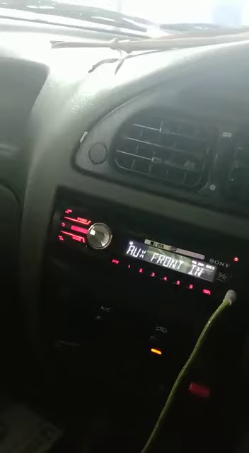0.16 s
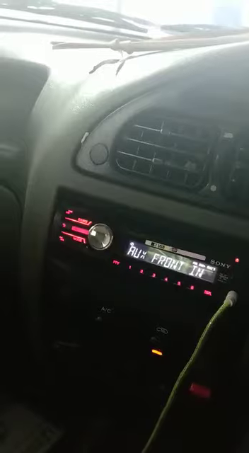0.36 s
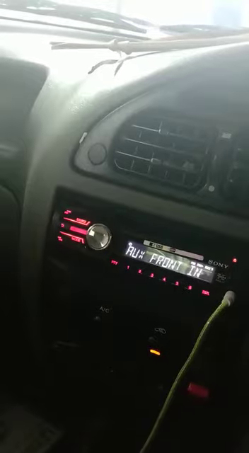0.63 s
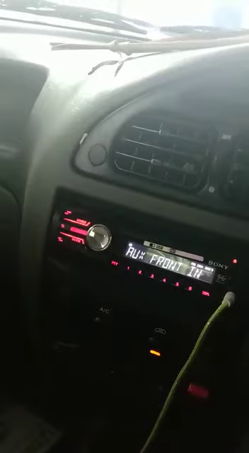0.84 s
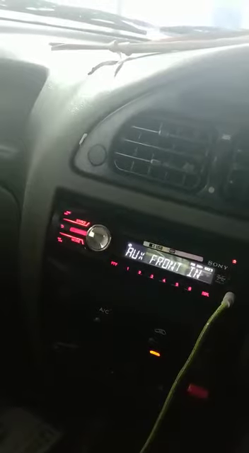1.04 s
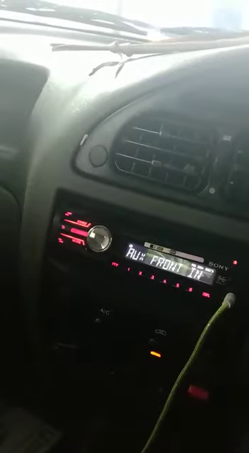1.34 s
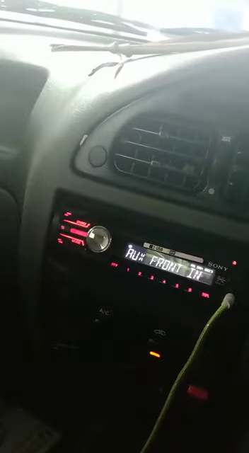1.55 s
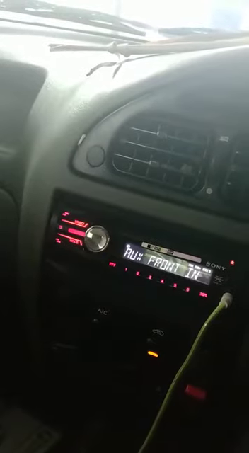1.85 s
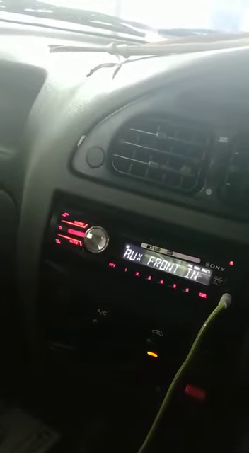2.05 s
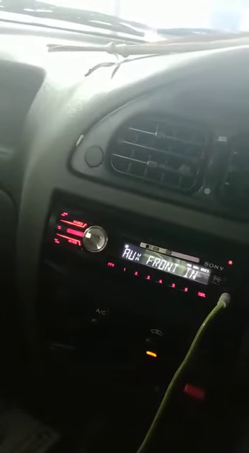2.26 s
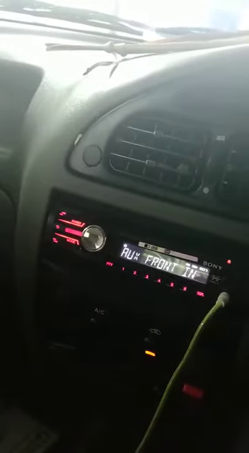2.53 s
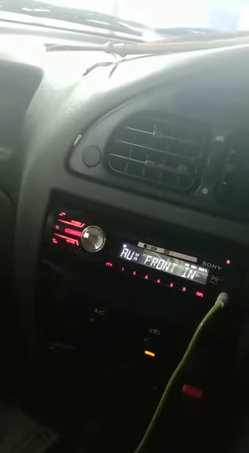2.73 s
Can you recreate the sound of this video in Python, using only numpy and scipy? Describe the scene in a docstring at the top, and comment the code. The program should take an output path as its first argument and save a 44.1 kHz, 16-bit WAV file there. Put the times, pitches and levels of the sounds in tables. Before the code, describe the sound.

A fan blade catching behind the dashboard makes loud crisp plastic snaps, about nine a second, after a quiet first half of engine rumble, airflow, thin motor whine and a dull faint knock; close cabin microphone.

```python
"""Inside a parked car with the engine idling, heard at one microphone: air hisses from the vents over the
engine's unsteady multiples and rumble, with a thin motor whine, a near-steady hum and a pulsing treble band.
The blower fan starts to catch on something behind the dashboard: each blade snap rings the same modes of
panels, duct and fan wheel and dies in the small cabin. Faint dulled knocks, four before the blade snaps
begin and one among them, are the same sound with a low thump."""
import sys
import numpy as np
from scipy import signal
from scipy.fft import rfft, irfft, next_fast_len
from scipy.io import wavfile
from scipy.ndimage import uniform_filter1d, minimum_filter1d, map_coordinates

SR = 44100
rng = np.random.default_rng(int(sys.argv[2]) if len(sys.argv) > 2 else 0)


def persist_wave(psi):
    """Save psi, clipped to +-1, as 16-bit WAV."""
    counts = np.round(np.clip(psi, -1, 1) * 32767).astype(np.int16)
    wavfile.write(sys.argv[1], SR, np.atleast_2d(counts).T)


def voltage_ratio(level):
    """Linear amplitude factor for a level in decibels (scalar or array-like)."""
    return 10 ** (np.asarray(level, float) / 20)


N = 127449

# Faint knocks: (time [s], level [dB], dulled above [Hz], thump level against the knock [dB])
KNOCK_EVENTS = [(.033, -35.5, 2630, -27), (0.341, -37.5, 2010, -9), (1.2132, -20, 750, -18),
                (1.226, -27, 900, -5), (2.127, -32, 3000, -14)]
# Blade snaps: (time [s], level before a common 9 dB lift and the limiter [dB])
SNAP_EVENTS = [(1.4145, -13), (1.517, -13.5), (1.6191, -13.5), (1.7323, -13.5), (1.8417, -13),
               (1.9522, -14.5), (2.0629, -14), (2.171, -14.5), (2.2833, -14), (2.392, -14), (2.4997, -14.5),
               (2.607, -14.5), (2.7082, -13), (2.8114, -13.5)]


def unit(x):
    """Scaled to rms 1."""
    return x / np.sqrt(np.mean(x ** 2) + 1e-20)


def along(points, hz):
    """Interpolates (Hz, value) points on a log frequency axis."""
    f, v = np.transpose(points)
    return np.interp(np.log(hz + 1), np.log(f + 1), v)


def curves(rows):
    """One value per sample for each column after the time."""
    s, *cols = np.transpose(rows)
    return [np.interp(np.arange(N) / SR, s, c) for c in cols]


def wobble(rate):
    """A smooth random curve, rate knots a second."""
    knots = rng.standard_normal(int(N * rate / SR) + 4)
    return map_coordinates(knots, [np.arange(N) * rate / SR])


def filtered(x, response):
    """x times a response of frequency."""
    m = next_fast_len(x.shape[-1] + 8192)
    spectrum = rfft(x, m) * response(np.fft.rfftfreq(m, 1 / SR))
    return irfft(spectrum, m)[..., :x.shape[-1]]


def rush(spectrum, patchy_db):
    """Coloured noise of rms 1 with patches of random gain in time and frequency."""
    z = signal.stft(rng.standard_normal(N), nperseg=512)[2]
    field = uniform_filter1d(rng.standard_normal(z.shape), 6, axis=0)
    field = uniform_filter1d(field, 12, axis=1)
    patchy = signal.istft(z * voltage_ratio(patchy_db * unit(field)), nperseg=512)[1][:N]
    return unit(filtered(patchy, lambda hz: voltage_ratio(along(spectrum, hz))))


def engine():
    """Idle: unsteady multiples of the firing rate, the sixth booming in the cabin, a hum and rumble."""
    # (time [s], firing rate [Hz])
    firing = [(0, 21.2), (.2, 21.65), (.95, 21.33), (1.4, 21.57), (1.9, 21.74), (2.4, 21.56), (2.89, 21.5)]
    # Multiples of the firing rate: (multiple, mean level [dB rms])
    orders = [(2, -48.5), (3, -58.5), (4, -54.5), (5, -64), (7, -61), (8, -57.5), (10, -56), (11, -59),
              (12, -58), (14, -56.5)]
    # Sixth multiple, lifted by the cabin: (time [s], mean level [dB rms])
    boom_db = [(0, -42), (.1, -39.5), (.3, -45), (.43, -39), (.59, -42), (.9, -38), (1.35, -38), (1.5, -42),
               (1.74, -44), (1.9, -39.5), (2.02, -45), (2.1, -41), (2.3, -44), (2.7, -43), (2.89, -44)]
    # Rumble colour: (frequency [Hz], relative density [dB per Hz])
    rumble_colour = [(13, -38.5), (22, -36), (54, -22.5), (85, -5.5), (129, -3), (154, 0.5), (178, -20),
                     (238, -6), (354, -3), (409, 0.5), (495, -10.5), (671, -8.5), (1000, -44), (1300, -66),
                     (2200, -120)]
    rate, = curves(firing)
    turn = 2 * np.pi * np.cumsum(rate) / SR
    lines = np.zeros(N)
    for k, db in orders:
        phase = k * turn + 0.37 * wobble(5.26) + 2 * np.pi * rng.random()
        lines += voltage_ratio(db + 1.13 * wobble(6.56)) * np.sin(phase)
    boom = voltage_ratio(curves(boom_db)[0] + 1.6 * wobble(14)) * np.sin(6 * turn + 0.42 * wobble(7.4))
    # a hum close beside the third multiple, 67.7 Hz
    hum_phase = 2 * np.pi * 67.7 * np.arange(N) / SR + 0.71 * wobble(3.64)
    hum = voltage_ratio(-46.5 + 1.1 * wobble(2.1)) * np.sin(hum_phase)
    rumble = voltage_ratio(-46 + 0.86 * wobble(2.5)) * rush(rumble_colour, patchy_db=-1.0)
    return np.sqrt(2) * (lines + boom + hum) + rumble


def motor_whine():
    """The blower motor: one sine of drifting pitch, unsteady in level and phase."""
    # (time [s], pitch [Hz], mean level [dB rms])
    whine = [(0, 409, -46.5), (.2, 413.5, -46), (.92, 405.5, -50), (1.25, 406, -48.5), (1.5, 411, -47.5),
             (2.2, 411, -51.5), (2.89, 412, -44.5)]
    hz, db = curves(whine)
    phase = 2 * np.pi * np.cumsum(hz) / SR + 0.28 * wobble(18)
    return np.sqrt(2) * voltage_ratio(db + 1.4 * wobble(15.17)) * np.sin(phase)


def vent_hiss():
    """Air from the vents: patchy coloured noise, its level drifting slowly."""
    # Hiss colour: (frequency [Hz], relative density [dB per Hz])
    air = [(470, -32), (800, 3), (920, -10), (1040, -5.5), (1280, -14.5), (1870, -11.5), (2730, -27.5),
           (4100, -9.5), (5280, -10), (6710, -13.5), (7720, -30.5), (9220, -38), (10100, -52), (15300, -44),
           (16500, -46.5)]
    return voltage_ratio(-55 + 0.62 * wobble(1.3)) * rush(air, patchy_db=2.2)


def treble_pulse():
    """A faint narrow band of noise whose level pulses regularly, with some random drift."""
    centre_hz, width_hz, mean_db = 8820, 450, -84.5
    pulses_per_s, first_peak_s = 7.95, .1
    band = unit(filtered(rng.standard_normal(N), lambda f: np.exp(-((f - centre_hz) / width_hz) ** 2)))
    pulse_db = 7 * np.cos(2 * np.pi * pulses_per_s * (np.arange(N) / SR - first_peak_s))
    return voltage_ratio(mean_db + pulse_db + 3 * wobble(7.2)) * band


def ring(mode_hz, mode_db, count, t):
    """Struck modes, one row a blow, each a little stronger or weaker; the mean blow peaks at 1."""
    # Decay of the modes: (frequency [Hz], time to fall 60 dB [s])
    ring_decay = [(250, 0.12), (400, 0.094), (800, 0.084), (1500, 0.079), (3000, 0.08), (6000, 0.081)]
    hz, db = np.array(mode_hz)[:, None], np.array(mode_db)[:, None]
    # low modes arrive late (lag in s at 249.2 Hz, falling with the square of pitch) and build slowly
    u = np.maximum(t - 0.00767 * (249.2 / hz) ** 2, 0)
    rise = 1 - np.exp(-u / (.0022 + 1.3 / hz))
    # starting phases scattered in a fixed pattern, in turns
    start = .618 * np.arange(len(hz))[:, None] ** 2
    decay = voltage_ratio(db - 60 * u / along(ring_decay, hz))
    tones = rise * decay * np.sin(2 * np.pi * (hz * u + start))
    scatter_db = 1.68 * rng.standard_normal((count, len(hz)))
    out = voltage_ratio(scatter_db) @ tones
    return out / np.abs(out.mean(0)).max()


def panel(count, t):
    """The dashboard panel: its low and middle modes ring when struck."""
    # Mode frequencies: (frequency [Hz])
    panel_hz = [250.0, 307.0, 374.0, 450.0, 493.0, 540.0, 694.0, 735.0, 883.0, 945.0, 1036.0, 1112.0,
                1152.0, 1222.0, 1276.0, 1362.0, 1429.0, 1505.0, 1615.0, 1669.0]
    # Their relative levels: (level [dB])
    panel_db = [-5.5, -9.5, 0.0, -8.0, -13, -12.5, -13, -8, -8, -14.5, -6.5, -8.5, -12.5, -14.5, -11, -14.5,
                -14.0, -18.5, -15.5, -12.5]
    return ring(panel_hz, panel_db, count, t)


def duct(count, t):
    """The air duct: a close row of modes above the panel's."""
    # Mode frequencies: (frequency [Hz])
    duct_hz = [1830.0, 1865.0, 1968.0, 2050.0, 2164.0, 2200.0, 2340.0, 2439.0, 2538.0, 2649.0, 2710.0,
               2780.0, 2904.0, 3165.0, 3297.0, 3420.0, 3510.0, 3639.0, 3709.0, 3873.0, 3959.0, 4024.0,
               4207.0, 4253.0, 4393.0, 4433.0, 4544.0]
    # Their relative levels: (level [dB])
    duct_db = [-9.5, -5.5, 1, 0.5, -2, -7.5, -8.5, -10.5, -5, -3.5, -4.5, 2, -3.5, -8, -12, -12, -17, -7.5,
               -10, -6.0, -5.0, -3, -5.5, -9, -6.5, -4.5, -5]
    return ring(duct_hz, duct_db, count, t)


def wheel(count, t):
    """The fan wheel: the highest of the struck modes."""
    # Mode frequencies: (frequency [Hz])
    wheel_hz = [4657.0, 4797.0, 4939.0, 5149.0, 5329.0, 5421.0, 5612.0, 5670.0, 5728.0, 5803.0, 5938.0,
                5984.0, 6124.0, 6226.0, 6270.0, 6358.0, 6490.0, 6716.0, 6796.0, 7004.0, 7206.0, 7337.0,
                7437.0, 7477.0, 7558.0]
    # Their relative levels: (level [dB])
    wheel_db = [-6, -8, -13, -9.5, 2, -6.5, -9.5, 2.5, -5, -8, 2.5, -8, -3.5, -0.5, 3, -3, 0.5, -1.5, -11,
                -9, -17, -15.5, -15.5, -22, -23]
    return ring(wheel_hz, wheel_db, count, t)


def cabin(count, t):
    """The cabin's dense answers: mostly one shared noise pattern, partly new each time, dying by band."""
    # Part of the answer that is new each blow: (frequency [Hz], share of amplitude)
    fresh = [(500, 0.05), (2000, 0.15), (5000, 0.17), (12000, 0.88)]
    # Colour of the answer: (frequency [Hz], relative density [dB per Hz])
    answer_colour = [(100, -13), (250, -27), (600, -22.5), (1000, -12.5), (2000, -9.5), (3300, -13),
                     (5000, -14), (6400, -8.5), (7400, -18), (8400, -26), (10200, -30.5), (12500, -30.5),
                     (13900, -49), (14600, -20.5), (15700, -30), (16100, -53.5), (17000, -81),
                     (19000, -120)]
    # Decay of the answer: (frequency [Hz], time to fall 60 dB [s])
    cabin_decay = [(200, .16), (700, 0.097), (1500, 0.041), (4000, 0.081), (8000, 0.066), (15000, 0.074)]

    def new_share(hz):
        return np.clip(along(fresh, hz), 0, 1)

    noise = rng.standard_normal((count + 1, len(t)))
    shared = filtered(noise[0], lambda hz: np.sqrt(1 - new_share(hz) ** 2))
    hz, s, z = signal.stft(shared + filtered(noise[1:], new_share), SR, nperseg=128)
    fall_db = 60 * s / along(cabin_decay, hz)[:, None]
    z = z * voltage_ratio(along(answer_colour, hz)[:, None] - fall_db)
    tails = signal.istft(z, SR, nperseg=128)[1][:, :len(t)]
    tails = tails * (1 - np.exp(-t / .003))  # soft onset
    return tails / (3 * tails[:, :SR // 50].std())  # set by the first 20 ms


def blows(count, t):
    """One row a blow: panel, duct and fan wheel ring together and the cabin answers."""
    struck = voltage_ratio(-11) * panel(count, t) + voltage_ratio(-7.5) * duct(count, t) + voltage_ratio(-9.5) * wheel(count, t)
    return struck + voltage_ratio(-7.5) * cabin(count, t)


def knocks(hits, t):
    """Faint knocks: the sound of the snaps, dulled by a two-pole low-pass, with a low decaying thump."""
    out = np.zeros(N + SR)
    thump = voltage_ratio(-60 * t / .1) * np.sin(2 * np.pi * 245 * t)
    for (s, db, top_hz, thump_db), hit in zip(KNOCK_EVENTS, hits):
        dull = filtered(hit, lambda hz: 1 / (1 + 1j * hz / top_hz) ** 2)
        out[round(s * SR):][:len(t)] += voltage_ratio(db) * (dull + voltage_ratio(thump_db) * thump)
    return out[:N]


def snaps(hits, t):
    """Blade snaps: the fan catches again and again, and every snap rings the same parts."""
    out = np.zeros(N + SR)
    lead_s = 0.00117  # each blow starts this long before its listed time
    for (s, db), hit in zip(SNAP_EVENTS, hits):
        out[round((s - lead_s) * SR):][:len(t)] += voltage_ratio(db + 9) * hit
    return out[:N]


def scene():
    """All sources at one microphone in the cabin."""
    t = np.arange(SR // 5) / SR
    hits = blows(len(KNOCK_EVENTS) + len(SNAP_EVENTS), t)
    steady = engine() + motor_whine() + vent_hiss() + treble_pulse()
    struck = knocks(hits[:len(KNOCK_EVENTS)], t) + snaps(hits[len(KNOCK_EVENTS):], t)
    return (steady + struck)[None]


def limiter(x):
    """Turns the gain down shortly before each loud peak and lets go soon after."""
    threshold_db, ratio = -24.5, .3  # ratio: dB of cut per dB over the threshold
    ahead, hold, smooth = round(.012 * SR), round(.008 * SR), round(.006 * SR)  # samples
    over_db = np.maximum(20 * np.log10(np.abs(x) + 1e-9) - threshold_db, 0)
    # the deepest cut needed from hold samples back to ahead samples on
    span = ahead + hold + 1
    need_db = minimum_filter1d(-ratio * over_db, span, origin=span // 2 - ahead - 1)
    return x * voltage_ratio(uniform_filter1d(need_db, smooth))


def band_limit(x):
    """A steep low-pass at the top of the band."""
    return signal.sosfilt(signal.butter(12, 16970, fs=SR, output="sos"), x)


def record(dry):
    """The recorder: its limiter holds down the loud peaks of the microphone signal."""
    mix = limiter(dry)
    return band_limit(mix)


dry = scene()
out = record(dry)
persist_wave(out)
```